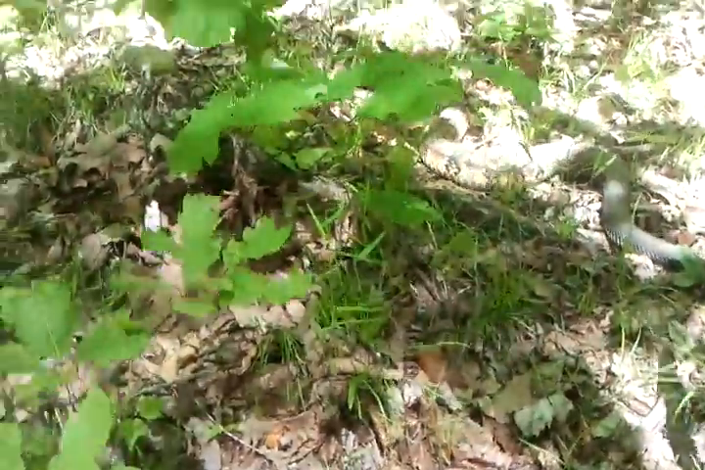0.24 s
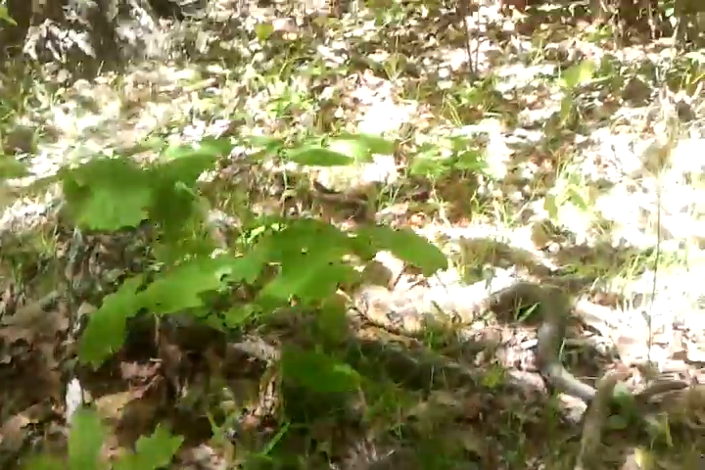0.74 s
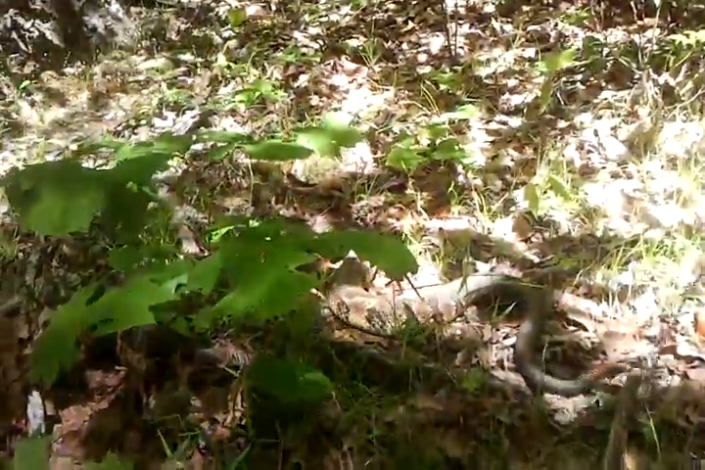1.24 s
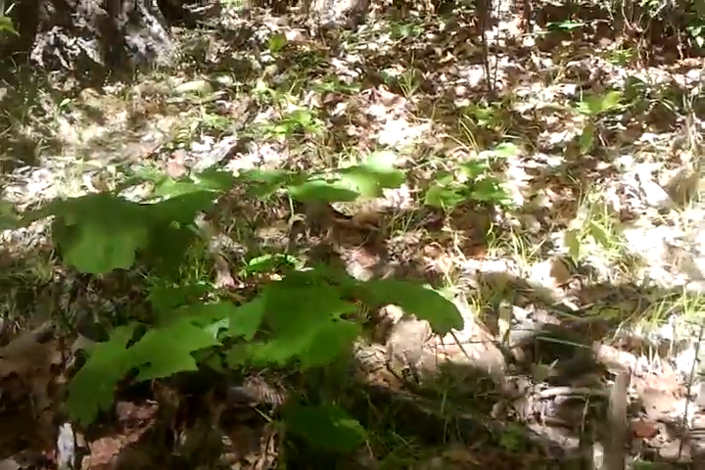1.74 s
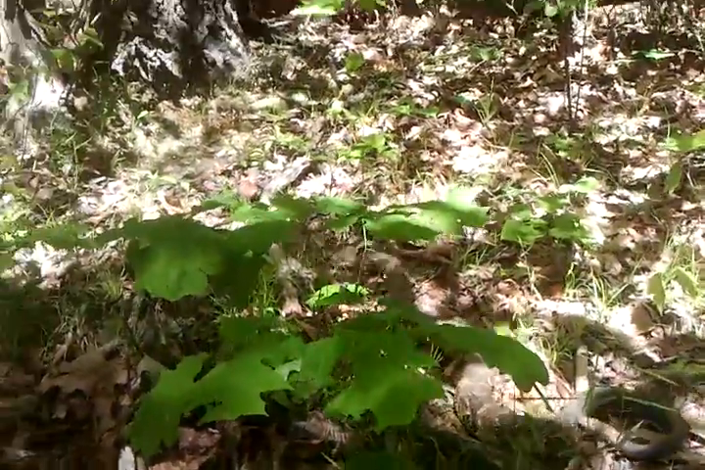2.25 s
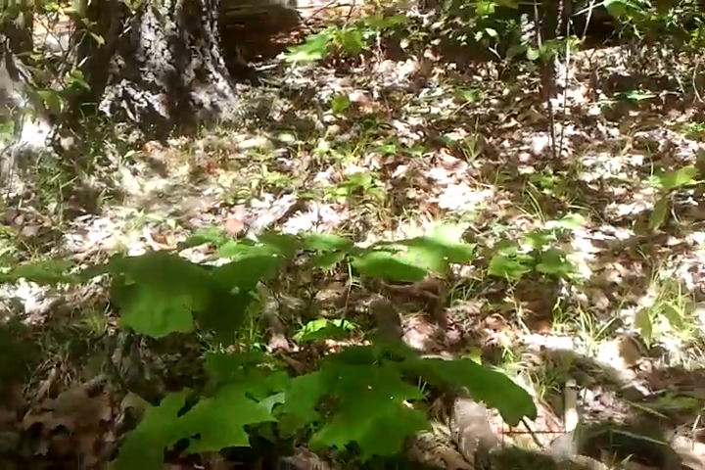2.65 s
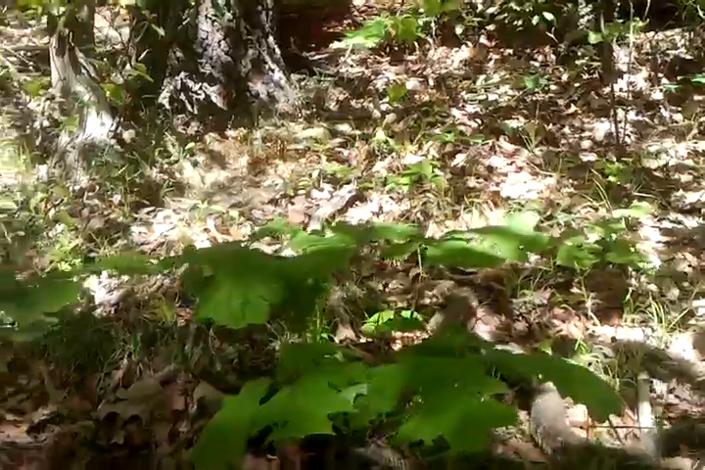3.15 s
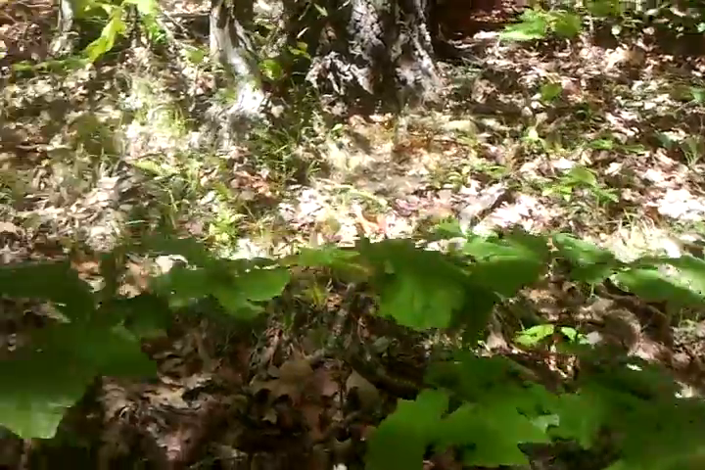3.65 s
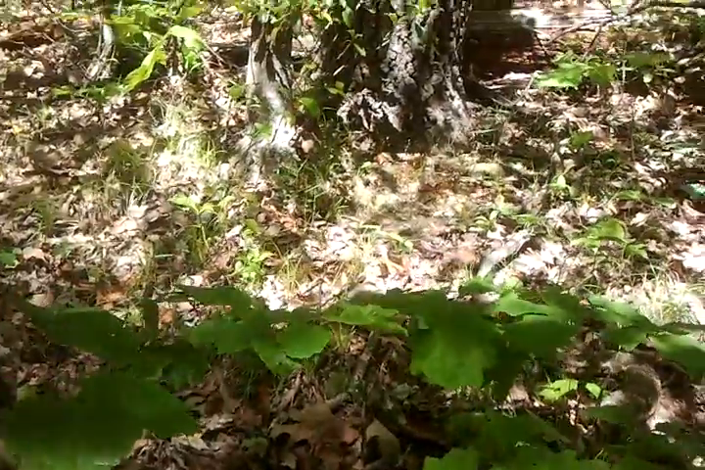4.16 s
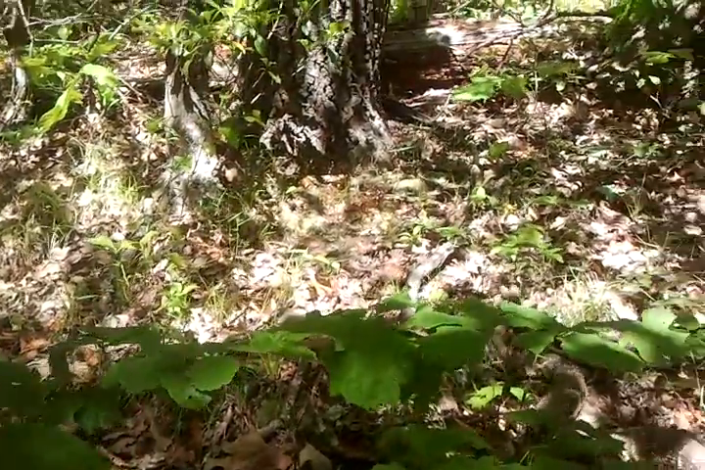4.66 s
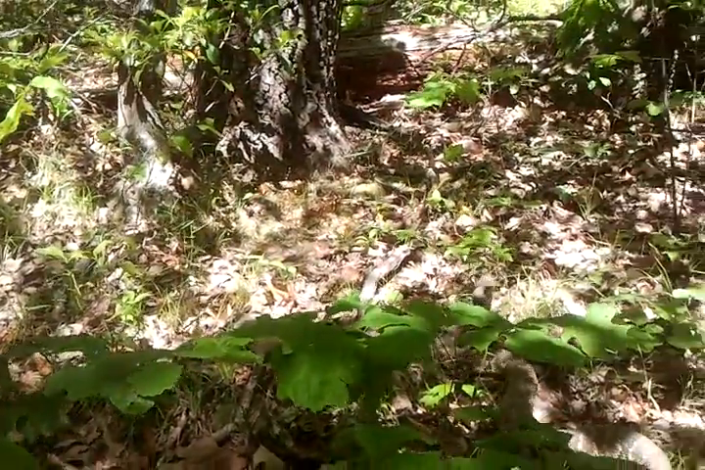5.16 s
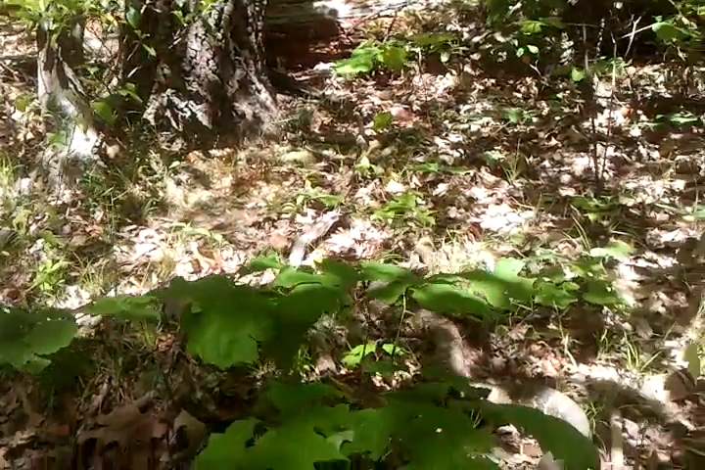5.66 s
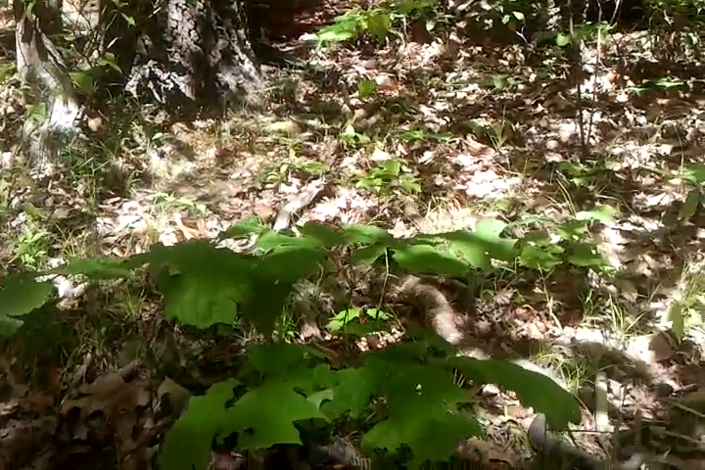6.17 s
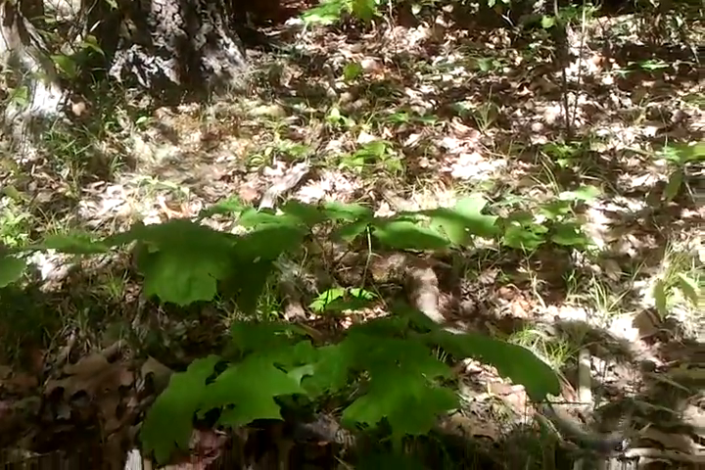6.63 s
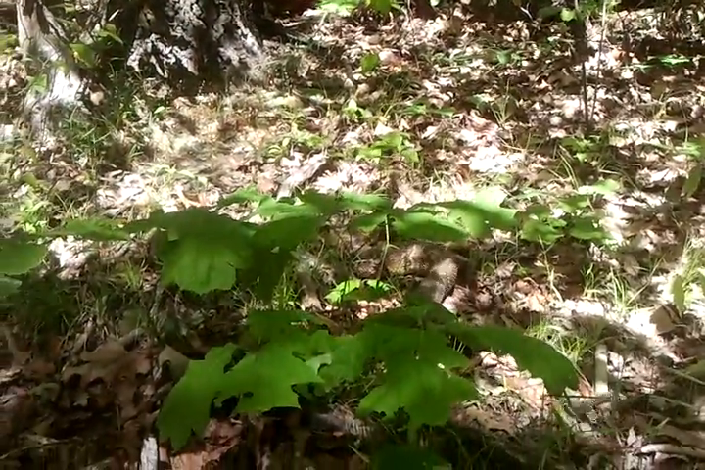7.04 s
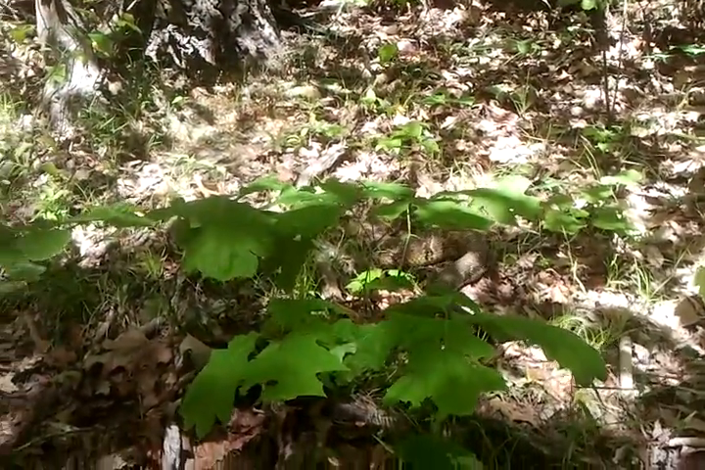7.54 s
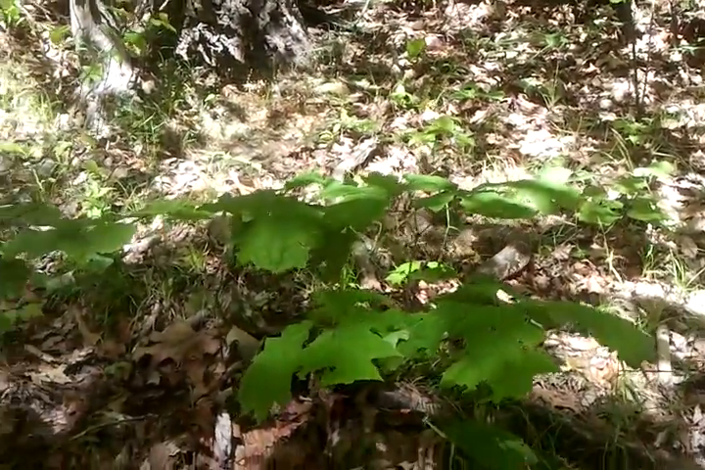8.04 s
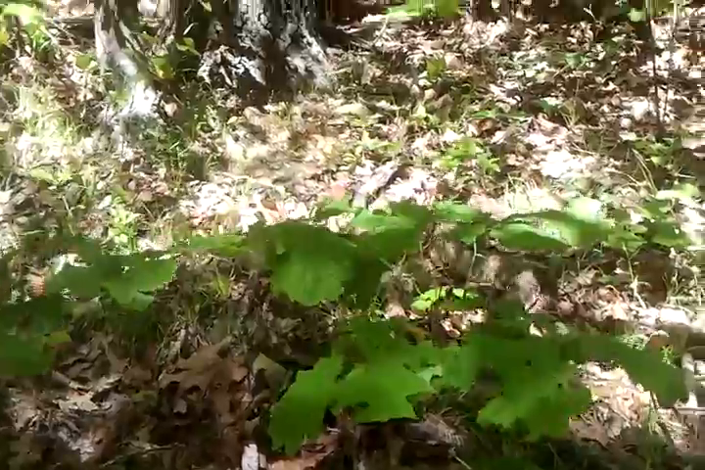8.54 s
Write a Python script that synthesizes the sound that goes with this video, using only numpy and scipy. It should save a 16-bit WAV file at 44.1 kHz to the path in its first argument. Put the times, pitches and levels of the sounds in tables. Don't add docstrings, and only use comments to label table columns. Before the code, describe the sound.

A snake works through dry leaf litter on a still forest floor, close and dry in mono, the very highest tones cut off. Faint air and preamp hiss runs throughout, with a low-level, papery tail buzz of fine ticks, about sixty uneven strokes a second. At 0.25 s the body whips round in a bright rustle; a sharp snap follows at 0.55. After a lull, another snap at 1.2 leads into brisk rustling around 1.5, and the loudest, hardest crack at 1.8. Dense ticks and crunchy swells continue to about 2.5. Strong brittle snaps come at 3.0 and 3.3, with lesser ones to 3.9. From 4 to 5 s, small cracks and thin leaf flicks cluster over soft pushes. Afterward the rustling swells gently, cracks grow sparse, and a quiet creep with a few small ticks remains until nearly 9 s.

```python
import sys
import numpy as np
from scipy import signal
from scipy.fft import rfft, irfft
from scipy.io import wavfile

SR = 44100
rng = np.random.default_rng(int(sys.argv[2]) if len(sys.argv) > 2 else 0)


def digitize_waveform(pressure):
    field = np.atleast_2d(pressure).T
    bounded = np.clip(field, -1, 1)
    quanta = np.round(bounded * 32767).astype(np.int16)
    wavfile.write(sys.argv[1], SR, quanta)


def level_to_linear(level):
    exponent = np.asarray(level, float) / 20
    return 10 ** exponent


N = 388080

# frequency in Hz, level in dB per Hz.
HISS_COLOUR = [(15, -39), (40, -10), (330, 0.5), (1200, -2.5), (3000, -6.5), (6500, -15), (9000, -8.5)]
# frequency in Hz, level in dB per Hz.
EDGE_COLOUR = [(2500, -19.5), (4000, -9.5), (5500, -6.5), (7000, -1), (8000, -5), (9000, -5.5)]
# frequency in Hz, level in dB per Hz.
BODY_COLOUR = [(30, 6), (200, -8.5), (600, -7), (1500, -1), (3000, 4), (4500, 6), (7000, -23.5)]
# time in seconds, bright rustle level in dB.
CREEP = [(0.05, -58), (0.2, -70), (0.57, -51.5), (0.8, -60), (1.08, -54), (1.3, -57), (1.48, -45),
         (1.78, -38.5), (1.9, -46), (2.28, -50), (2.64, -48), (2.77, -58), (3.1, -56), (4.0, -59),
         (4.95, -53), (5.2, -64), (6.9, -54), (7.15, -66)]
# peak time in seconds, rustle level in dB, rise in seconds per 10 dB,
# fall in seconds per 10 dB.
PUSHES = [(0.258, -34, .012, .07), (0.342, -41.5, .12, .006), (1.197, -47, .15, .1), (1.402, -43, .07, .15),
          (1.523, -34, .035, .022), (1.59, -34.5, .025, .11), (2.0, -43, .15, .18), (2.38, -35, .05, .07),
          (2.549, -45.5, .1, .05), (2.819, -47, .04, .25), (3.228, -46, .08, .15), (3.577, -47, .15, .1),
          (3.896, -48, .09, .15), (4.126, -52, .02, .25), (4.5, -48, .08, .18), (4.894, -46, .08, .04),
          (5.024, -46, .06, .09), (3.36, -45, .05, .13), (5.38, -44, .04, .06), (5.542, -51, .2, .3),
          (5.966, -50, .1, .15), (6.415, -50, .05, .06), (6.58, -50, .2, .09), (7.408, -51.5, .18, .04),
          (7.513, -50, .03, .025), (7.68, -53, .03, .12), (7.832, -48.5, .08, .08), (8.06, -45.5, .13, .08),
          (8.296, -47.5, .15, .2), (8.795, -48.5, .6, .1)]
# start in seconds, peak level in
# dB, body level below 3 kHz in dB.
TICKS = [(0.6383, -27, -20), (0.945, -33, -3), (1.1082, -26, -25), (1.4104, -26, -2), (1.6976, -22, -2),
         (1.7795, -17, -18), (1.8342, -21, -17), (1.9622, -25, -13), (1.9768, -24, -9), (2.1779, -24, -5),
         (2.3998, -20, -2.5), (2.6797, -27, -24), (2.732, -28, -26), (2.931, -25, -21), (3.2645, -27, -8),
         (3.5058, -26, -22), (3.6865, -27, -14.5), (4.3316, -29, 1), (4.6784, -29, -7), (4.8647, -29, -20),
         (4.917, -30, -9), (4.9648, -30, -16), (6.058, -27, -14), (6.2512, -31, -8), (7.0588, -31, -7),
         (7.2924, -30, -18), (7.3602, -31, -15), (7.8351, -24, -17), (7.8898, -35, 8), (8.6063, -32, 7),
         (0.2502, -28, -9), (0.378, -33, 6), (1.3199, -30, -8), (1.3626, -30, 2), (1.5422, -26, -15),
                (1.8696, -29, -15), (1.8964, -26.5, -12), (1.9103, -28, -15), (1.9264, -25, -20),
                (1.9329, -25, -10), (1.9407, -29, -11), (1.9703, -24, -2), (2.036, -26.5, -10),
                (2.128, -28, -2), (2.1706, -28, -10), (2.2035, -27, -18), (2.257, -30, -9),
                (2.345, -26, -8), (2.3739, -28, -12), (2.4193, -24, -13), (2.76, -33, -15),
                (3.1833, -30, -15), (3.2727, -28, -2), (3.8344, -28, -17), (3.855, -27, -17)]
# start in seconds, peak level in dB, ring in Hz, body level below 3 kHz in dB.
SPLITS = [(0.28, -27, 7500, -5), (1.2043, -23, 7080, -9), (1.2305, -25, 7080, -24), (1.3393, -26, 5680, -8),
          (1.3878, -25, 7170, -1.5), (1.5686, -21, 6350, -10), (2.0297, -19.5, 6500, -9),
          (2.0466, -23, 7430, -10), (3.5844, -22, 6610, -9.5), (3.965, -28, 4370, -26),
          (4.0549, -30, 5470, -10), (4.1198, -23, 6610, -11), (4.2253, -30, 7150, -3),
          (4.3595, -24, 5320, -14), (4.5835, -24.5, 5320, -23), (4.7227, -21, 5430, -12),
          (4.7355, -27, 6830, -3), (4.8938, -22, 6800, -19), (5.5208, -25, 6180, -11),
          (5.7708, -25, 6700, -6), (6.2946, -27, 6500, -7.5), (6.3922, -26.5, 6400, -19),
          (6.4126, -26, 6330, -4.5), (6.5591, -28, 7730, -8), (7.5026, -28, 7080, -21),
          (7.6559, -29, 4410, -9), (7.9488, -25.5, 7450, -17), (7.9803, -25, 5900, -20),
          (8.528, -25.5, 6980, -13), (8.7724, -22.5, 6740, -7)]
# start in seconds, peak level in dB, ring in Hz.
FLICKS = [(0.3424, -24, 7700), (0.504, -30, 6200), (1.4837, -28, 5000), (1.7928, -22, 7560),
          (2.4399, -25, 7020), (3.5644, -28, 6960), (3.7934, -30, 7020), (3.949, -29, 6500),
          (4.0012, -29, 7500), (4.4544, -26, 6290), (4.4792, -25, 7500), (4.4975, -27, 6000),
          (4.5235, -27, 5500), (4.5651, -26, 5510), (4.6092, -27, 5530), (4.7778, -28, 6500),
          (5.0799, -28, 7060), (5.467, -29, 7500), (5.546, -26, 6500), (5.5744, -28, 6800),
          (5.632, -29, 6800), (5.692, -27, 7110), (5.9723, -28, 6800), (6.1944, -30.5, 6500),
          (6.4307, -28, 6160), (7.019, -32, 7500), (7.6285, -31, 6910), (7.785, -29, 5500),
          (8.0392, -29, 6800), (8.6624, -29, 6680)]
# start in seconds, peak level in dB, ring in Hz, body level below 3 kHz in dB,
# length in milliseconds.
SNAPS = [(0.4226, -21.5, 6500, -10, 1.07), (0.5558, -9.5, 7900, -20, 1.6), (0.5567, -12, 7000, -17, 1.56),
         (1.162, -20, 7110, -9, 3.2), (1.1884, -11.5, 6870, -16, 0.9), (1.5856, -19, 6680, -7.7, 4.7),
         (1.7259, -22, 6590, 2.5, 2.4), (1.7976, -16, 7800, -15, 2.7), (1.8105, -4.5, 7450, -12, 1.17),
         (1.8529, -18, 6830, -13, 1.2), (2.065, -23, 6290, -2, 2.7), (2.8141, -23, 7730, -26, 2.1),
         (3.0068, -18.5, 6600, -6, 3.8), (3.0101, -15, 7410, -17.7, 1.7), (3.041, -10, 6900, -11, 1.6),
         (3.3287, -12, 6400, -7, 1.6), (3.3934, -22, 6850, -7, 2.6), (3.4016, -20.5, 5040, 1.5, 0.89),
         (3.6383, -15, 6180, -18, 0.86), (3.7664, -22.5, 6200, -7, 4.5), (3.8918, -22, 6310, -18, 1.1),
         (4.8038, -22.5, 4070, 2.5, 2.1), (4.8074, -20.5, 6700, -20, 4.5), (7.0618, -26.5, 7260, -5, 2.4)]
# frequency in Hz, gain in dB.
ROLL_OFF = [(7400, 0.5), (7900, 0), (8400, -7.5), (8800, -19), (9100, -35.5), (9500, -75.5)]

HISS_DB, BUZZ_DB = -56.5, -55.5
SETTLE_DB, SETTLE_S = -39, .034
CRUNCH_DB, CRUNCH_FOLLOWS = -57.3, .8


def rms_one(x):
    return x / np.sqrt(np.mean(x ** 2) + 1e-20)


def coloured(x, points):
    size = x.shape[-1]
    hz = np.arange(size // 2 + 1) * SR / size + 1
    table_hz, table_db = np.array(points, float).T
    gain_db = np.interp(np.log(hz), np.log(table_hz), table_db)
    return irfft(rfft(x) * level_to_linear(gain_db), size)


def drift(rate_hz):
    r = np.exp(-2 * np.pi * rate_hz / SR)
    wander = signal.lfilter([1], [1, -2 * r, r * r], rng.standard_normal(N + SR))
    return rms_one(wander[SR:])


def grains(per_s, spread_db, t60, low_hz, high_hz, count):
    born = rng.random(N) < per_s / SR
    sizes = born * level_to_linear(spread_db * np.minimum(rng.exponential(1, N), 4))
    leaf = rng.integers(0, count, N)
    fade = level_to_linear(-60 / (t60 * SR))
    out = 0
    for k, hz in enumerate(np.geomspace(low_hz, high_hz, count)):
        envelope = signal.lfilter([1], [1, -fade], sizes * (leaf == k) + 1e-9)
        puff = envelope * rng.standard_normal(N)
        band = signal.butter(1, [hz / 2.67, min(hz * 1.37, .45 * SR)], "band", fs=SR)
        out = out + signal.lfilter(*band, puff) / np.sqrt(hz)
    return out


def hiss():
    return level_to_linear(HISS_DB) * rms_one(coloured(rng.standard_normal(N), HISS_COLOUR))


def tail_buzz():
    phase = np.cumsum(60 * (1 + .12 * drift(6.3))) / SR
    stroke = 1 + 0.23 * np.cos(2 * np.pi * phase)
    ticks = grains(3000 * stroke, 1.8, 0.0053, 4300, 7200, count=3)
    return level_to_linear(BUZZ_DB) * rms_one(coloured(ticks, EDGE_COLOUR))


def stirring():
    t = np.arange(0, N + 64, 32) / SR
    settling = [(s + .003, db + 20 * np.log10(ms) + SETTLE_DB, .002, SETTLE_S) for s, db, _, _, ms in SNAPS]
    s, db, rise, fall = np.transpose(PUSHES + settling)[:, :, None]
    away = np.maximum((s - t) / rise, (t - s) / fall)
    swells = level_to_linear(2 * db - 20 * away).sum(axis=0)
    creep = level_to_linear(2 * np.interp(t, *np.transpose(CREEP)))
    return np.interp(np.arange(N) / SR, t, 10 * np.log10(swells + creep))


def rustle(bright_db):
    crunch_db = CRUNCH_DB + CRUNCH_FOLLOWS * (bright_db + 50.)
    clumps = level_to_linear(3 * drift(40))
    edges = grains(2000 * clumps, 2.73, .002, 3500, 11000, count=5)
    bodies = grains(1100 * clumps, 3.25, 0.0027, 300, 4300, count=5)
    edges = rms_one(coloured(edges, EDGE_COLOUR)) * level_to_linear(bright_db + 0.35)
    bodies = rms_one(coloured(bodies, BODY_COLOUR)) * level_to_linear(crunch_db)
    return edges + bodies


def cracks(s, peak_db, ring_hz, body_db, body_hz, length_ms, trim_db):
    size, lead = 1024, 48
    t, hz = np.arange(size) / SR, np.arange(size // 2 + 1) * SR / size
    draw = rng.standard_normal((len(s), size))
    tearing = np.maximum(length_ms - .7, .1) / 1000
    dying = 1.6 * level_to_linear(-14 * (t / tearing) ** 0.9) + level_to_linear(-19.5 - 60 * t / 0.032)
    splinters = dying * draw * np.abs(draw) / 4 * (1 - (t / t[-1]) ** 2)
    splinters[:, 0] = np.sign(draw[:, 0])

    ring_shape = 1 / (1 + 1j * (hz - ring_hz) / 1300) ** 2 + .19
    ring_shape = ring_shape / (1 + (hz / 8600) ** 16) / (1 + (2800 / (hz + 1)) ** 6)
    ring = irfft(rfft(splinters) * ring_shape)

    pitch = 1j * hz / body_hz
    body_shape = (900 / body_hz + pitch) / (1 + 1.5 * pitch + pitch ** 2)
    body_shape = body_shape / (1 + (hz / 5400) ** 6)
    splinters[:, 0] *= 2.2
    body = irfft(rfft(splinters) * body_shape)

    energy = length_ms * SR / 5000
    ring = ring * np.sqrt(energy / np.sum(ring ** 2, axis=1, keepdims=True))
    body = body * np.sqrt(energy / np.sum(body ** 2, axis=1, keepdims=True))
    sound = level_to_linear(peak_db + trim_db) * np.roll(ring + level_to_linear(body_db - 2.5) * body, lead, axis=1)
    first = ((s - .2 * tearing) * SR).astype(int) - 6 - lead
    out = np.zeros(N + size)
    np.add.at(out, first + np.arange(size), sound)
    return out[:N]


def crackle(bright_db, count):
    when, size, pitch, body = rng.random((count, 4)).T[:, :, None]
    when = when * (N / SR - .01) + .005
    rustle_power = level_to_linear(2 * bright_db[(when * SR).astype(int)])
    bed_db = 10 * np.log10(rustle_power + level_to_linear(2 * BUZZ_DB))
    peak_db = bed_db - 3 * np.log(size + 0.08)
    ring_hz = 4500 + 3500 * np.sqrt(pitch)
    return cracks(when, peak_db, ring_hz, -22 + 20 * body, 2500, 1.3, trim_db=8)


def ticks():
    s, peak_db, body_db = np.transpose(TICKS)[:, :, None]
    ring_hz = rng.normal(6800, 500, s.shape)
    return cracks(s, peak_db, ring_hz, body_db, 2700, 1.6, trim_db=-3.5)


def leaf_body_hz(body_db):
    return 2300 - 50 * body_db


def splits():
    s, peak_db, ring_hz, body_db = np.transpose(SPLITS)[:, :, None]
    return cracks(s, peak_db, ring_hz, body_db, leaf_body_hz(body_db), 1.5, trim_db=-1.8)


def flicks():
    s, peak_db, ring_hz = np.transpose(FLICKS)[:, :, None]
    return cracks(s, peak_db, ring_hz, -11, 3000, 1.6, trim_db=-3.4)


def snaps():
    s, peak_db, ring_hz, body_db, ms = np.transpose(SNAPS)[:, :, None]
    return cracks(s, peak_db, ring_hz, body_db, leaf_body_hz(body_db), ms, trim_db=-1.83)


def scene():
    stir_db = stirring()
    bed = hiss() + tail_buzz() + rustle(stir_db) + crackle(stir_db, count=480)
    breaks = ticks() + splits() + flicks() + snaps()
    return (bed + breaks)[None]


def top_cut(x):
    return signal.sosfilt(signal.butter(12, 9450, fs=SR, output="sos"), x)


def record(dry):
    faint = level_to_linear(-100) * rng.standard_normal(dry.shape)
    return top_cut(coloured(dry, ROLL_OFF) + faint)


dry = scene()
out = record(dry)
digitize_waveform(out)
```